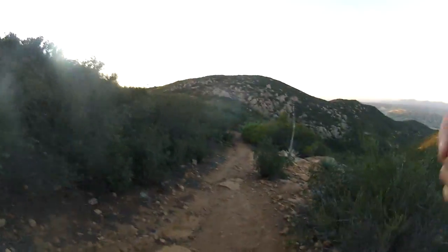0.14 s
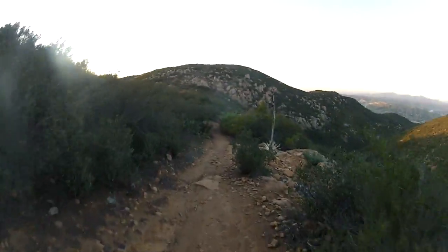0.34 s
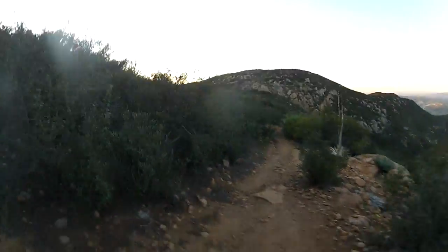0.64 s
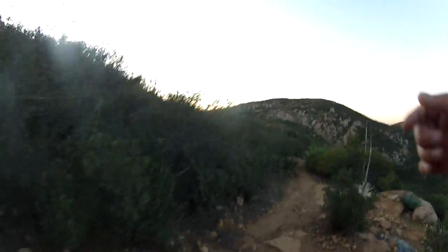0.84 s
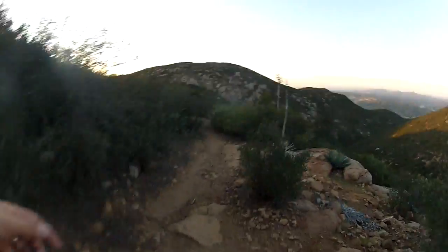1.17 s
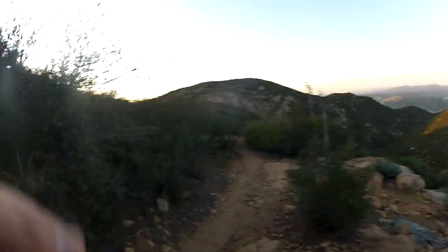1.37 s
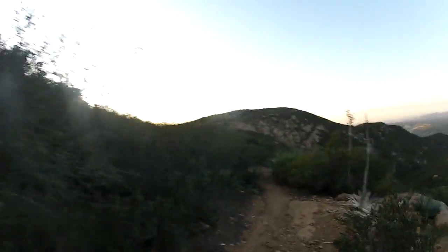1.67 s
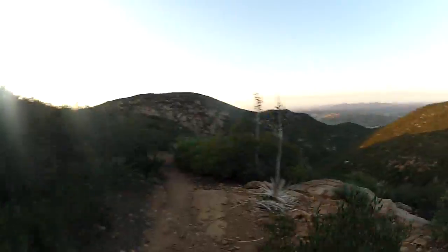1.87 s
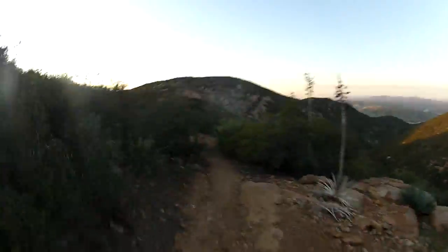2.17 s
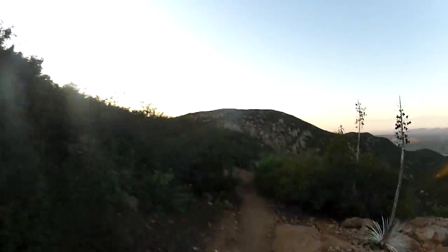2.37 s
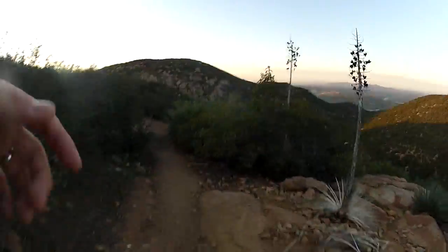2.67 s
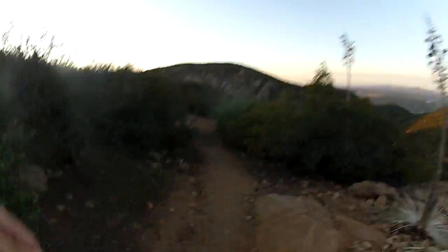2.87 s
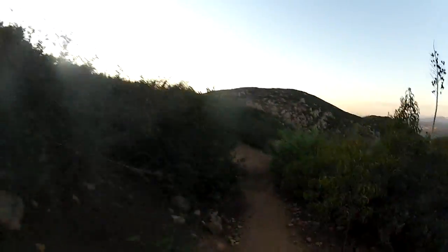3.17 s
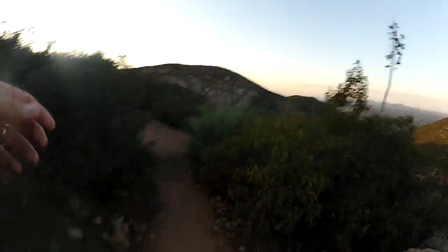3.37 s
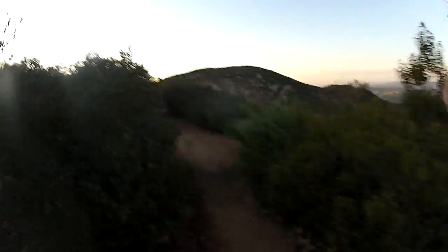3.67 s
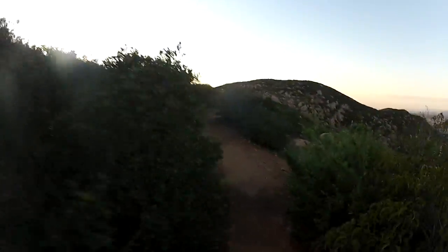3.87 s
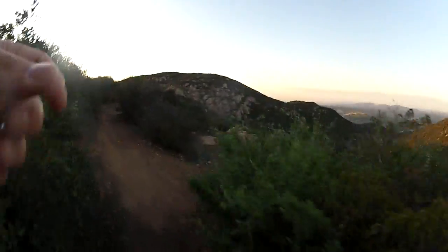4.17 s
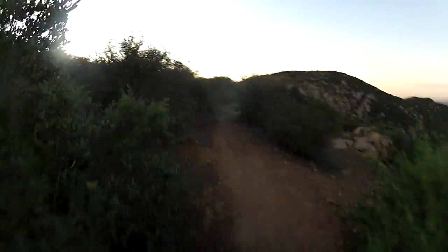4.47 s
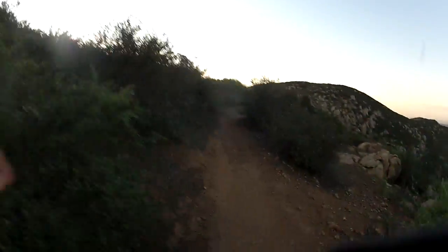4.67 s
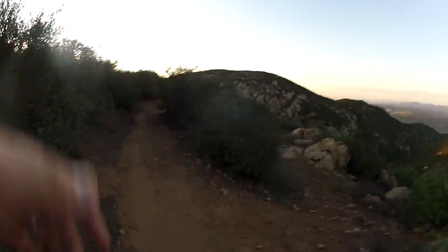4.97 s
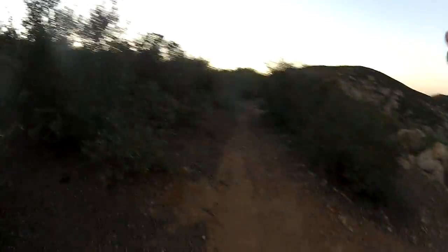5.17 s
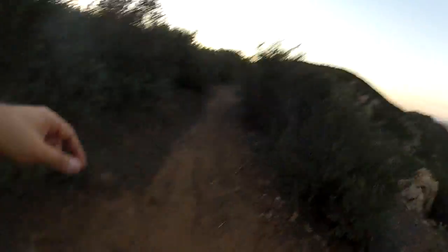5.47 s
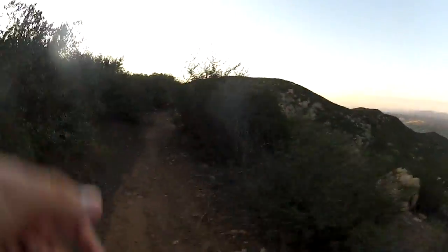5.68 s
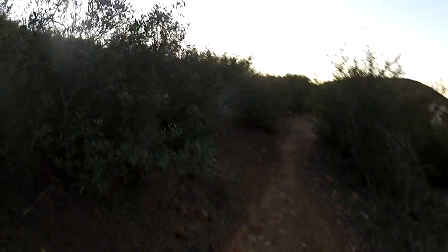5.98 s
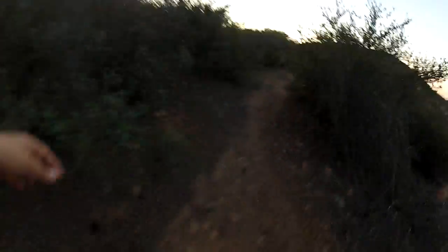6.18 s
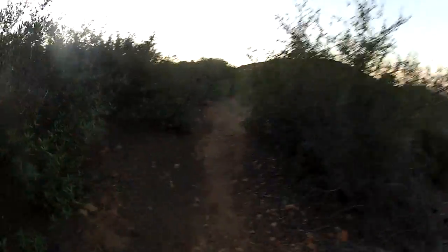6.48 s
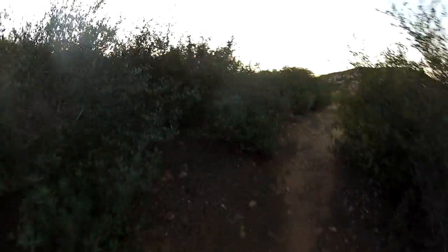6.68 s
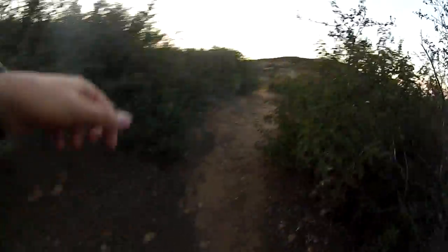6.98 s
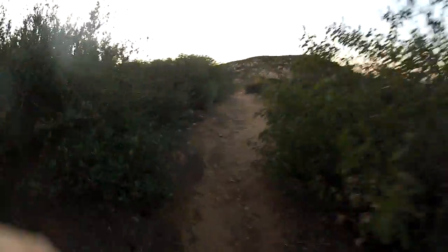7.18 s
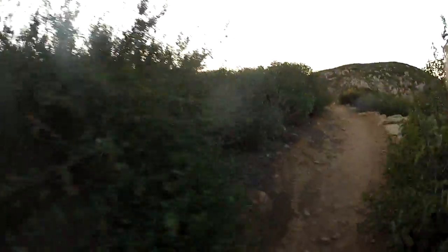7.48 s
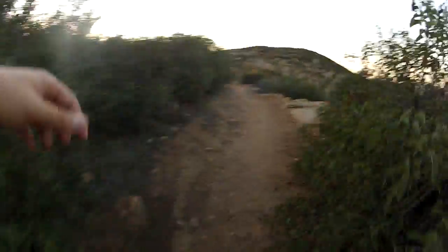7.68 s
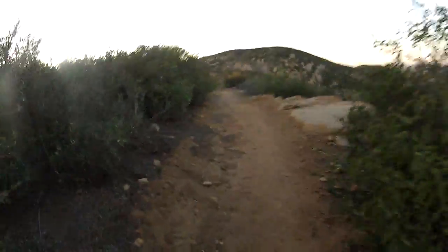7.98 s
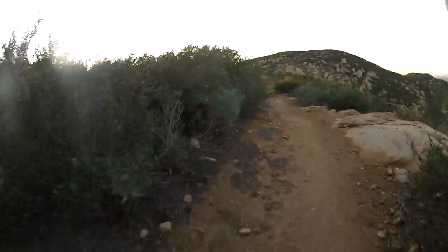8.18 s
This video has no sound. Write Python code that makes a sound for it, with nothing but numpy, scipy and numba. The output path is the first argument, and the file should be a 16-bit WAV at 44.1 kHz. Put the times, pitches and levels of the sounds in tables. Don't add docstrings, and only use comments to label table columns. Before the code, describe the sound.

Running on a dirt trail, heard from inside a sealed camera case worn on the body. It begins fairly quietly with fabric brushing and tiny ticks, then settles into jolting low thuds, each with scratchy muffled rubbing and a small metallic bounce. Irregular sharp plastic cracks overload the microphone. In the second half, brief buzzing zips of a ribbed strap appear. Everything is close, almost mono, muffled and coarse, over faint hiss.

```python
import sys
import numpy as np
from scipy import signal
from scipy.io import wavfile
from scipy.ndimage import uniform_filter1d
from numba import njit

SR = 44100
rng = np.random.default_rng(int(sys.argv[2]) if len(sys.argv) > 2 else 0)


def waveform_to_disk(signal):
    frames = np.transpose(np.atleast_2d(signal))
    scaled = np.clip(frames, -1, 1) * 32767
    samples = np.round(scaled).astype(np.int16)
    wavfile.write(sys.argv[1], SR, samples)


def voltage_ratio(level):
    return 10 ** (np.asarray(level, float) / 20)


N = 367353
TIME = np.arange(N) / SR


@njit
def svf(x, hz, width):
    y, band_state, low_state = np.empty(len(x)), 0., 0.
    for i in range(len(x)):
        g, k = np.tan(np.pi * hz[i] / SR), width / hz[i]
        v = (band_state + g * (x[i] - low_state)) / (1 + g * (g + k))
        band_state = 2 * v - band_state
        low_state = low_state + 2 * g * v
        y[i] = k * v
    return y


def band(x, hz, width_hz):
    return svf(x + 1e-18, hz + np.zeros(len(x)), 1. * width_hz)


def modes(x, table):
    return sum((-1) ** k * voltage_ratio(db) * band(x, hz, width) for k, (hz, width, db) in enumerate(table))


def cut(x, hz, kind, order):
    return signal.sosfilt(signal.butter(order, hz, kind, fs=SR, output="sos"), x)


def steep(x, hz, stop_db):
    return signal.sosfilt(signal.ellip(7, .6, stop_db, hz, fs=SR, output="sos"), x)


def unit(x):
    return x / np.sqrt(np.mean(x ** 2))


def walk(rate):
    k = int(SR / rate)
    levels = np.repeat(rng.standard_normal(N // k + 1), k)[:N]
    return unit(uniform_filter1d(levels, k))


def swell(s, hold, db, rise, sag, fall, rest_db):
    coarse = TIME[::SR // 1000]
    since = coarse - np.array(s)[:, None]
    hold = np.clip(hold, 0, None)[:, None]
    shape_db = np.array(db)[:, None] + rise * np.minimum(since, 0)
    shape_db = shape_db - sag * np.clip(since, 0, hold) - fall * np.maximum(since - hold, 0)
    power = np.sum(voltage_ratio(2 * shape_db), axis=0) + voltage_ratio(2 * rest_db)
    return np.interp(TIME, coarse, np.sqrt(power))


def add(out, s, db, sound):
    i = int(s * SR)
    out[i:i + len(sound)] += (voltage_ratio(db) * sound / np.abs(sound).max())[:N - i]


HISS_DB, SEAL_HZ = -51, 3806


def hiss():
    air = rng.standard_normal(N)
    return voltage_ratio(HISS_DB) * (steep(band(air, 2600, 3500), SEAL_HZ, 40) + voltage_ratio(-12.5) * air)


# [start_s, sway_db, jolt_db]
STEPS = [(0.237, -29, -55), (0.62, -32.5, -60.0), (0.715, -29.5, -44), (0.929, -46, -38),
         (1.155, -23.5, -25.5), (1.514, -23, -35.5), (1.881, -24, -35), (2.268, -25.5, -45),
         (2.405, -60.0, -33.5), (2.608, -23.5, -30), (2.975, -25, -32.5), (3.372, -27.5, -32.5),
         (3.718, -24.5, -36), (3.813, -32.5, -44), (4.07, -25, -29.5), (4.398, -30.5, -54),
         (4.472, -37, -40), (4.801, -23.5, -35), (5.139, -30, -32.5), (5.242, -28, -39.5),
         (5.519, -29, -36.5), (5.934, -26.5, -35.5), (6.212, -29, -30), (6.387, -37.5, -66),
         (6.569, -33, -60.0), (6.654, -29, -37), (6.99, -33.5, -32.5), (7.348, -31, -37),
         (7.717, -36.5, -33.5), (8.102, -29, -42)]
SWAY_RISE_DB_S, SWAY_FALL_DB_S, SWAY_REST_DB = 119, 89, -50
JOLT_RISE_DB_S, JOLT_FALL_DB_S, JOLT_REST_DB = 220, 200, -52.5
STROKE_JOLT_DB = -4.5


def shake():
    s, sway_db, jolt_db = np.transpose(STEPS)
    sway_gain = swell(s, 0 * s, sway_db, SWAY_RISE_DB_S, 0, SWAY_FALL_DB_S, SWAY_REST_DB)
    step_gain = swell(s, 0 * s, jolt_db + 1.5, JOLT_RISE_DB_S, 0, JOLT_FALL_DB_S, JOLT_REST_DB)
    s, hold, level_db = np.transpose([row[:3] for row in STROKES] + list(BRUSHES))
    tug_gain = swell(s, hold, level_db + STROKE_JOLT_DB, *RUB_RATES_DB_S, JOLT_REST_DB)
    jolt_gain = np.hypot(step_gain, tug_gain)
    noise = rng.standard_normal((2, N))
    sway = cut(cut(noise[0], 34.8, "low", order=2), 14, "high", order=2)
    jolt = cut(band(noise[1] * voltage_ratio(3.13 * walk(40)), 180, 227), 221.4, "low", order=3)
    return sway_gain * unit(sway) + jolt_gain * unit(jolt)


# [crest_s, peak_db, pitch_hz]
PUSHES = [(0.715, -19, 72.6), (1.099, -25, 91), (1.851, -21.5, 152), (1.873, -14.5, 173), (1.924, -20, 72),
          (2.269, -25.5, 82), (2.558, -18, 196), (2.569, -27, 80), (2.589, -11, 94), (2.951, -35, 77),
          (3.012, -28, 69.4), (3.361, -15.5, 85), (3.38, -11, 154), (3.415, -15, 92), (3.722, -30, 63.3),
          (4.04, -35, 147), (4.085, -26, 81), (4.096, -17.5, 87), (5.923, -26, 182), (5.976, -37, 87),
          (5.989, -17, 164), (6.19, -12.5, 124), (6.211, -4, 252), (7.061, -24, 131), (7.409, -26, 131),
          (7.637, -11.5, 200), (7.6419, -23, 200)]
# [crest_s, peak_db, pitch_hz]
PULLS = [(0.919, -21.5, 92), (1.085, -20, 52.7), (1.139, -10.5, 198), (1.17, -18, 380), (1.175, 6, 104),
         (1.474, -27, 107), (1.491, -25, 90.5), (1.502, -15, 120), (1.889, -31, 134), (1.903, -20, 139),
         (2.624, -3.5, 115), (2.965, -16, 71.5), (3.348, -20, 200), (3.703, -22.5, 74), (3.754, -28, 53.4),
         (4.068, -19, 89), (5.073, -18.5, 157), (5.527, -32, 166), (6.016, -22.5, 72), (6.136, -21, 156),
         (6.241, -28, 141), (6.269, -24.5, 116), (6.651, -20.5, 173)]


def thumps():
    out, t = np.zeros(N), TIME[:SR // 10] - 1 / 20
    for rows, way in ((PUSHES, 1), (PULLS, -1)):
        for s, db, hz in rows:
            bell = np.exp(-(t * hz / 0.41) ** 2)
            add(out, s - 1 / 20, db, way * bell * np.cos(2 * np.pi * hz * t - .3))
    return out


# [start_s, peak_db, bounce_after_ms]
BUCKLE_LANDINGS = [(0.7336, -30.5, 14.5), (1.1757, -33, 34), (1.538, -27.5, 39), (2.2505, -28, 36.5),
                   (2.622, -26, 84), (3.013, -27.5, 35), (3.387, -30.5, 44.4), (3.75, -31.5, 24),
                   (4.115, -30.5, 30.5), (4.8515, -30, 14), (5.9417, -36, 21), (6.9656, -34, 45.9),
                   (7.3138, -42, 26.9)]
# [start_s, peak_db]
FAINT_TICKS = [(0.0643, -53.5), (0.0983, -49), (0.2922, -50), (0.3386, -44), (0.819, -41), (1.282, -38),
               (1.343, -38), (1.4521, -43), (1.496, -41), (1.655, -43), (1.9074, -29), (2.171, -39),
               (2.3615, -41), (3.466, -41), (3.7334, -41), (3.826, -36), (4.0208, -44), (4.4877, -37),
               (4.502, -33), (5.0878, -51), (5.1706, -45), (5.6645, -50), (5.7223, -45), (6.669, -33),
               (6.7825, -48), (6.915, -42), (7.0424, -37), (7.175, -45), (7.8994, -47)]
# [pitch_hz, width_hz, level_db]
BUCKLE_MODES = [(4600, 1500, 1), (5130, 280, -7)]
BOUNCE_DB = -5.5


def buckle():
    out, t = np.zeros(N), TIME[:SR // 16]
    ticks = list(FAINT_TICKS)
    for s, db, bounce_ms in BUCKLE_LANDINGS:
        ticks += [(s, db), (s + bounce_ms / 1000, db + BOUNCE_DB)]
    for s, db in ticks:
        noise = rng.standard_normal(len(t))
        fade_s = 0.0027 * voltage_ratio(0.12 * (min(db, -28) + 41))
        add(out, s, db + 0.5, modes(noise * t * np.exp(-t / fade_s), BUCKLE_MODES))
    return cut(out, 2300, "high", order=4)


# [start_s, length_s, peak_db, top_rib_rate_hz, end_rib_rate_hz]
ZIPS = [
    (4.108, 0.047, -29, 840, 1080),
    (5.204, 0.068, -19.5, 1130, 950),
    (5.918, 0.08, -19, 1144, 484),
    (6.639, 0.056, -20, 1014, 624),
    (7.366, 0.069, -16.5, 1053, 700),
    (8.101, 0.068, -19.5, 970, 566),
]
ZIP_START_HZ = 640.3


def zips():
    out, wobble = np.zeros(N), walk(300)
    for s, length, db, top_hz, end_hz in ZIPS:
        u = np.linspace(-1, 1, int(length * SR))
        hz = top_hz * (1 - u ** 2) + u * (ZIP_START_HZ * (u - 1) + end_hz * (u + 1)) / 2
        rough = wobble[int(s * SR):][:len(u)]
        phase = 2 * np.pi * np.cumsum(hz * (1 + 0.039 * rough)) / SR
        slips = np.sin(phase) + 0.23 * np.sin(phase / 2) + 0.47 * np.sin(2 * phase)
        add(out, s, db, slips * voltage_ratio(3.8 * rough[::-1]) * (1 - u ** 4))
    return out


# [pitch_hz, width_hz, level_db]
SHELL_MODES = [(633, 106, -5), (1130, 89, 0.5), (1924, 147, 5), (2576, 120, -3), (3460, 200, -7.5)]
# [pitch_hz, width_hz, level_db]
LEAK = [(3950, 220, -68), (5860, 1160, -22)]


def shell(x):
    return steep(modes(x, SHELL_MODES), SEAL_HZ, 49) + modes(x, LEAK)


# [start_s, hold_s, level_db, dull_part_minus_rustle_db]
STROKES = [(0.903, 0.065, -34, -16), (1.117, 0.068, -31, -6.3), (1.205, 0.12, -37, -9.5),
           (1.56, 0.16, -36.5, -9), (1.846, 0.14, -37, -8), (2.333, 0.12, -35, -9),
           (2.559, 0.063, -33.5, -8.5), (2.663, 0.15, -37.5, -9.5), (2.945, 0.017, -33.5, -12.5),
           (3.023, 0.049, -33, -7.5), (3.121, 0.042, -38.5, -10), (3.334, 0.0073, -35, -5.5),
           (3.389, 0.039, -31.5, -5), (3.682, 0.014, -41, -9), (3.777, 0.025, -31.5, -6.4),
           (3.858, 0.029, -35.5, -11), (4.104, 0.067, -34, -4), (4.486, 0.031, -30.5, -4.5),
           (4.846, 0.059, -31.5, -4), (5.12, 0.033, -38, -7.5), (5.22, 0.021, -28, -7.5),
           (5.498, 0.099, -32.5, -7), (5.949, 0.029, -30, 0), (6.244, 0.12, -34.5, -6),
           (6.663, 0.026, -30, -6.5), (6.955, 0.13, -32, -8.5), (7.293, 0.022, -34, -11.5),
           (7.38, 0.039, -31, -4.5), (7.732, 0.062, -32.5, -1.3), (8.112, 0.039, -33, -4.5)]
# [start_s, hold_s, level_db]
BRUSHES = [(0.005, 0.03, -46), (0.24, 0.0044, -46.5), (0.432, 0.18, -40.5), (0.675, 0.019, -35.5),
           (0.787, 0.073, -39.9), (1.426, 0.005, -53.4), (1.468, 0.024, -37.5), (1.997, 0.062, -38),
           (2.226, 0.013, -45), (3.442, 0.13, -41), (3.994, 0.17, -39.5), (4.196, 0.077, -45),
           (4.385, 0.028, -41.5), (4.567, 0.05, -42.5), (4.96, 0.012, -36), (5.036, 0.1, -50),
           (5.321, 0.004, -47.5), (5.418, 0.007, -47.5), (5.634, 0.1, -42), (5.879, 0.004, -36),
           (6.026, 0.063, -41.5), (6.408, 0.004, -45.7), (6.581, 0.018, -37), (6.763, 0.069, -52),
           (7.184, 0.042, -56.5), (7.514, 0.016, -49.3), (7.682, 0.032, -41), (7.857, 0.03, -50.8),
           (8.02, 0.043, -43.5), (8.227, 0.043, -47.5)]
RUB_RATES_DB_S, RUB_REST_DB = (463, 24.5, 522), -56.5
BRUSH_DULL_DB, DULL_LIFT_DB = -12, 8


def rubbing():
    rows = list(STROKES) + [(*row, BRUSH_DULL_DB) for row in BRUSHES]
    s, hold, level_db, dull_db = np.transpose(rows)
    grit = voltage_ratio(4 * np.minimum(rng.exponential(size=N), 6))
    unsteady = voltage_ratio(1.06 * walk(300) + 2.79 * walk(45))
    grains = rng.standard_normal((2, N)) * (1 + 0.083 * grit) * unsteady
    held = np.zeros(N)
    for k, (hz, width, db) in enumerate(SHELL_MODES):
        grip_gain = voltage_ratio(db + 0.97 * walk(12))
        held += (-1) ** k * grip_gain * band(grains[0], hz * (1 + 0.024 * walk(7)), width)
    rustle = steep(held + voltage_ratio(-19) * band(grains[1], 2900, 2200), SEAL_HZ, 50) + modes(grains[0], LEAK)
    fold = band(band(grains[1], 740, 650), 740, 650)
    extra_db = 10 * np.log10(np.clip(voltage_ratio(2 * (dull_db + DULL_LIFT_DB)) - voltage_ratio(-8.5), 1e-3, None))
    rustle_gain = voltage_ratio(2.0) * swell(s, hold, level_db, *RUB_RATES_DB_S, RUB_REST_DB)
    dull_gain = voltage_ratio(-6.0) * swell(s, hold, level_db + extra_db, *RUB_RATES_DB_S, RUB_REST_DB - 27.5)
    return rustle_gain * unit(rustle) + dull_gain * unit(fold)


# [start_s, peak_db, low_ring_hz, high_ring_hz, low_minus_high_ring_db]
TAPS = [
    (1.047, -29, 1140, 2070, -16),
    (1.116, 1.2, 1788, 3586, 3),
    (6.207, -0.5, 935, 1920, -6.5),
]
KNOCKS = [
    (3.3095, 1.5, 964, 2230, 0),
    (4.731, 5.5, 1079, 1760, 3.5),
    (4.74, 5.5, 1110, 2260, -8),
    (5.818, 4.5, 804, 1840, -5.5),
    (6.177, -15, 970, 1730, 5),
    (6.185, -5.5, 660, 1820, -7),
]
SLAPS = [
    (2.504, -32.5, 1010, 2560, -7),
    (4.477, -19.5, 758, 1830, -0.5),
    (6.652, -20.5, 770, 1880, 10),
    (7.602, 3.5, 1130, 1820, -1),
]
TAP_MS, KNOCK_MS, SLAP_MS = 2.5, 3, 6
# [start_s, peak_db, pitch_hz, time_to_fall_60_db_s]
CLASP = [
    (5.823, -12, 696, 0.052),
]


def knocks():
    out, t = np.zeros(N), TIME[:SR // 12]
    lead = SR // 40
    for rows, ms in ((TAPS, TAP_MS), (KNOCKS, KNOCK_MS), (SLAPS, SLAP_MS)):
        for s, db, low_hz, high_hz, low_db in rows:
            noise = rng.standard_normal(lead + len(t))
            sway = np.cumsum(unit(band(noise, 257, 400))[lead:]) * 0.026
            ring = voltage_ratio(low_db) * np.sin(2 * np.pi * low_hz * t + sway)
            ring = ring + np.sin(2 * np.pi * high_hz * t - 0.3 * sway)
            ring = ring + 0.45 * unit(shell(noise))[lead:] + 0.45 * unit(band(noise, 6500, 1300))[lead:]
            after = np.clip(t - ms / 1000, 0, None)
            fade = voltage_ratio(-60 * after / 0.0081) + 0.43 * voltage_ratio(-60 * t / 0.033)
            blow = -np.tanh(1.3 * ring) * np.clip(t / 0.0002, 0, 1) * fade
            treble_gain = voltage_ratio(4.8 * min(db, 0)) * voltage_ratio(-60 * after / 0.0028)
            treble = treble_gain * cut(blow, 3500, "high", order=2)
            add(out, s, db, cut(blow, 3600, "low", order=6) + treble)
            add(out, s, db - 10.5, -np.sin(2 * np.pi * 340 * t) * np.exp(-t / 0.00089))
    for s, db, hz, t60 in CLASP:
        add(out, s, db, np.sin(2 * np.pi * hz * t) * voltage_ratio(-60 * t / t60))
    return out


def scene():
    body = shake()
    mono = hiss() + body + thumps() + buckle() + zips() + rubbing() + knocks()
    side = voltage_ratio(-25) * np.roll(body, SR // 30) + voltage_ratio(-48) * np.roll(mono, SR // 900)
    return mono + side * np.array([[1], [-1]])


DUCK_ABOVE, DUCK_DB, DUCK_WAIT_S, DUCK_RECOVER_S = 1, -12.5, .006, 0.027


def duck(dry):
    keep = np.exp(-1 / (DUCK_RECOVER_S * SR))
    overload = np.abs(cut(dry[0], 500, "high", order=2)) > DUCK_ABOVE
    hot = signal.lfilter([1 / 30], [1, -keep], overload)
    return dry * voltage_ratio(DUCK_DB * np.roll(np.tanh(hot), int(DUCK_WAIT_S * SR)))


def band_limit(x):
    return signal.sosfilt(signal.butter(12, 16480, fs=SR, output="sos"), x)


def record(dry):
    faded = signal.lfilter(*signal.iirnotch(6000, 9, SR), duck(dry))
    slow = np.clip(signal.resample_poly(faded, 40, 147, axis=1), -1.02, 1.02)
    held = signal.resample_poly(np.repeat(slow, 4, axis=1), 147, 160, axis=1)[:, :N]
    held = np.pad(held, ((0, 0), (0, N - held.shape[1])))
    mix = np.clip(steep(held, 15250, 30), -1, 1)
    return band_limit(mix)


dry = scene()
out = record(dry)
waveform_to_disk(out)
```